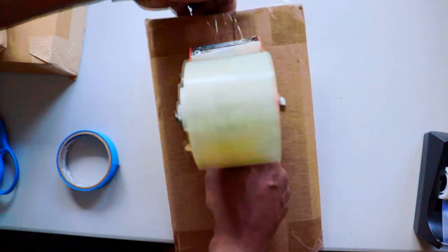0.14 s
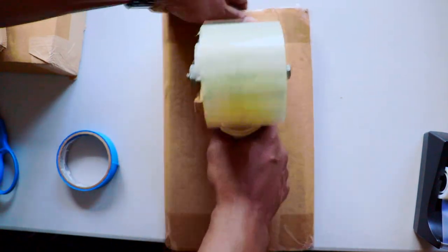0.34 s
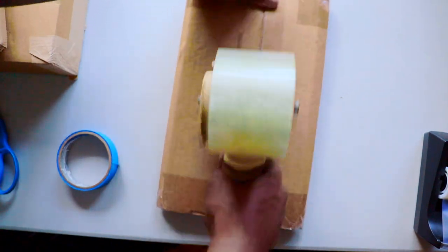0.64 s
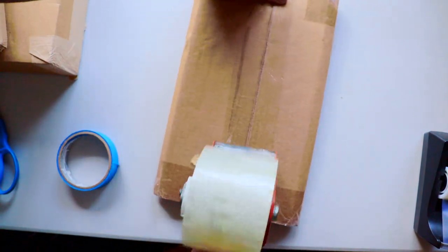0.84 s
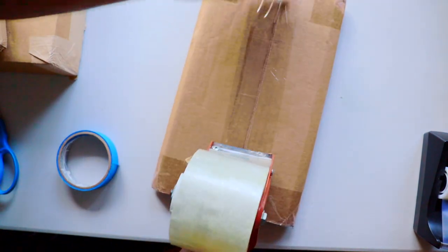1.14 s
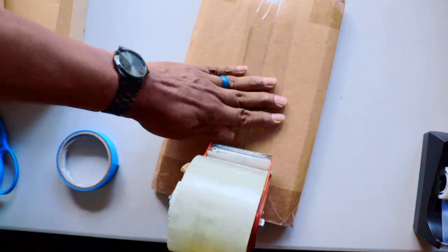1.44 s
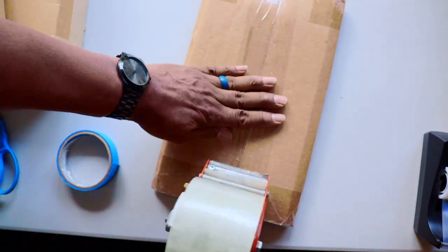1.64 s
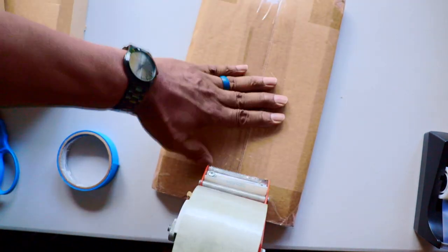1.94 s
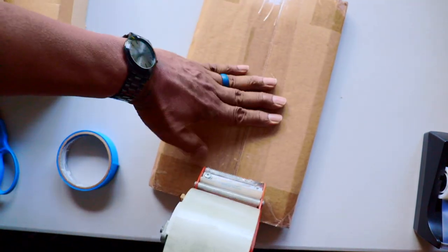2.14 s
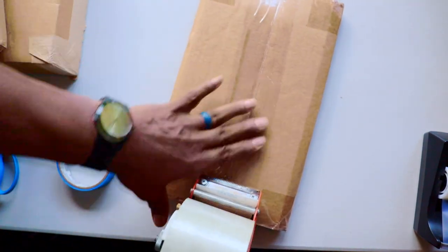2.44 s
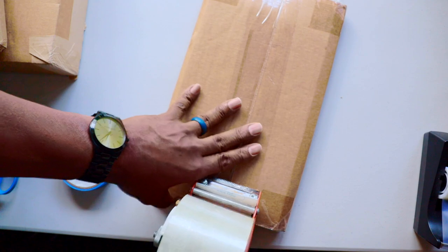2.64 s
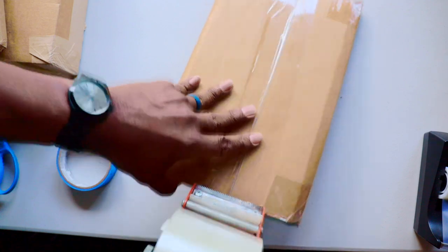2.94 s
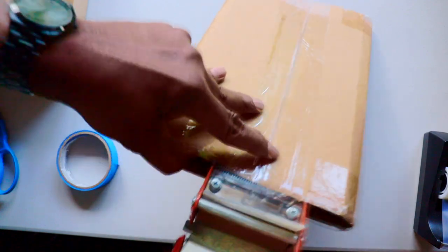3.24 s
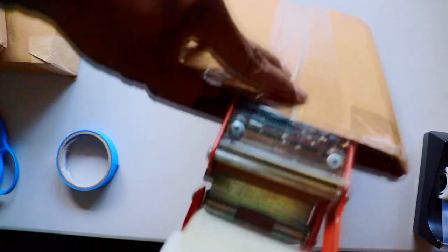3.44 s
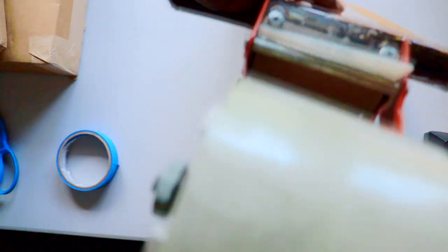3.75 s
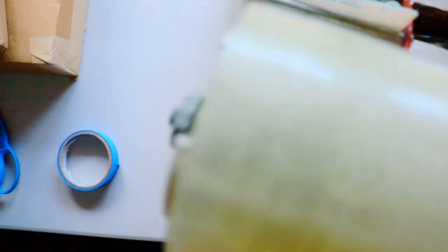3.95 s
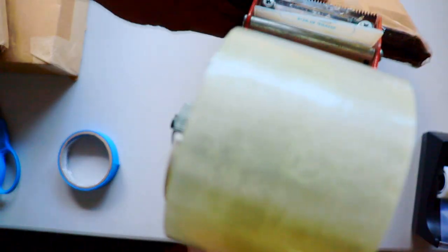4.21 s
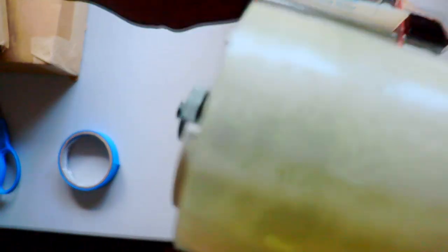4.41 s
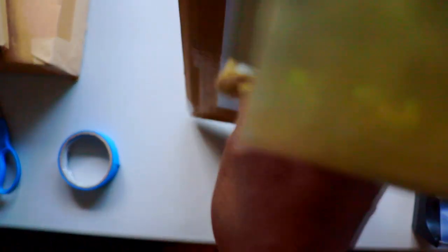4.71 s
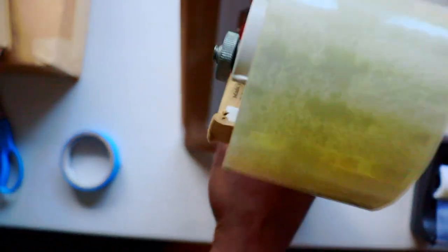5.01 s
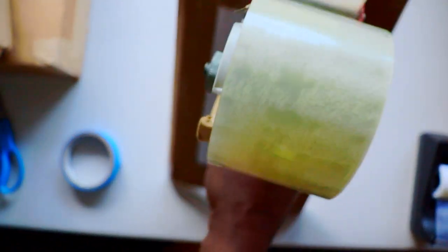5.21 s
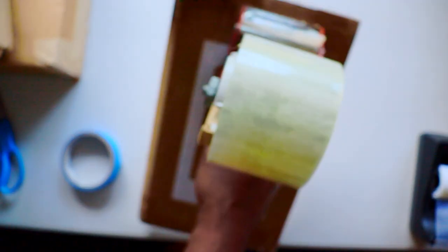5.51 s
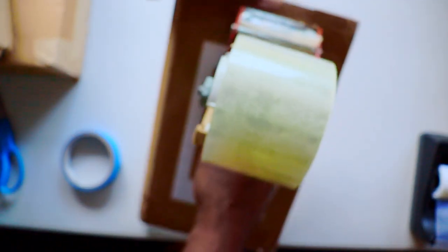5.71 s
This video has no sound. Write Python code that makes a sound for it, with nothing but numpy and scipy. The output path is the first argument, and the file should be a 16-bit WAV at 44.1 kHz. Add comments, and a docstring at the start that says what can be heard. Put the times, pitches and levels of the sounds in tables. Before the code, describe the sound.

Close stereo pickup, slightly right of centre, of sticky tape on a hollow carton on a table. Light scuffs and clacks lead to a long bright rip; sparse short rips and snaps follow. Later come roller scuffing, low box rumble, a juddering crackly tape drag with pops, a loud humming scrape of the dispenser and one final tug, with short room reflections.

```python
"""Packing tape leaves the roll of a handheld dispenser in a rasp of stick-slip snaps, laid on a cardboard box.
Uneven impulses excite film and cardboard: one long pull early on, short pulls and tugs before and after it,
and a late wrap round the edge. Roller and hand scuff the cardboard as filtered grains; the box rumbles and
bumps in its low modes, the frame drones, the roller squeaks in gliding tones, and clacks and pops are brief
resonant impulses. The box lies on a table in a small room, heard as drifting stereo reflections."""
import sys
import numpy as np
from scipy import signal
from scipy.io import wavfile
from scipy.ndimage import uniform_filter1d, map_coordinates

SR = 44100
rng = np.random.default_rng(int(sys.argv[2]) if len(sys.argv) > 2 else 0)


def generate_wav(signal):
    """Clip the signal to [-1, 1] and save it as 16-bit WAV at the path in sys.argv[1]."""
    frames = np.transpose(np.atleast_2d(signal))
    scaled = np.clip(frames, -1, 1) * 32767
    pcm = np.round(scaled).astype(np.int16)
    wavfile.write(sys.argv[1], SR, pcm)


N = 258867  # samples
TIME = np.arange(N) / SR  # seconds
BINS = np.fft.rfftfreq(4096, 1 / SR)  # frequencies of every body spectrum, Hz
EDGE_HZ = 16050  # upper band limit

# All levels in the tables are relative; most sources set a gain of their own on top, the crease pops do not.
# Brief scuffs of hand and dispenser. Each row: start in seconds, hold in seconds, level in dB,
# change over the hold in dB, hiss of the film against the scuff in dB.
SCUFF_STROKES = [(0.012, 0.026, -41.5, 4, 0), (0.099, 0.11, -45, 6, -8), (0.284, 0.024, -36.5, -14.5, -5),
                 (0.317, 0.069, -49.5, 8, -4), (1.101, 0.031, -48, 1, -10), (2.316, 0.11, -71.5, -3.5, 11),
                 (2.553, 0.16, -70, -12, 0.5), (2.755, 0.092, -52, 7, -1), (5.708, 0.2, -44.5, -11, -11.5)]
SCUFF_RISE_S, SCUFF_FALL_S = 0.049, 0.045  # time to reach full level; time to lose 30 dB
# The roller runs over the cardboard, one list a run. Each row: time in seconds, level of the scuff in dB,
# level of the hiss in dB.
ROLLER_RUNS = [
    [(3.04, -44, -51), (3.066, -37, -44.5), (3.096, -44.5, -44), (3.116, -47, -48), (3.166, -49.5, -62),
     (3.194, -43, -49), (3.38, -38, -49.5), (3.41, -51, -55.5), (3.436, -39.5, -43.5), (3.498, -50.5, -61),
     (3.574, -52, -65), (3.615, -70, -100)],
    [(3.715, -65, -61), (3.749, -55.5, -51.5), (3.759, -54, -63), (3.785, -40, -45.5), (3.853, -47.5, -62),
     (3.945, -32.5, -41.5), (3.985, -32.5, -43.5), (4.067, -41.5, -47), (4.229, -36.5, -48.5),
     (4.239, -36, -53), (4.321, -39.5, -46.5), (4.4, -41, -42.5)],
    [(4.95, -46.5, -61), (5.016, -51.5, -77.5), (5.058, -44, -73), (5.122, -30.5, -36), (5.178, -29, -48.5),
     (5.202, -29.5, -37), (5.388, -29.5, -38.5), (5.45, -35, -47.5), (5.47, -39.5, -45),
     (5.478, -47, -42.5), (5.562, -40, -43.5), (5.62, -80, -89)],
]
# Spectrum of scuffed cardboard. Each row: frequency in Hz, level in dB.
SCUFF_SPECTRUM = [(250, -37.5), (420, -8), (552, -5), (970, -9.5), (1840, -8), (2350, -13.5), (2570, -7.5),
                  (2900, -13.5), (4180, -20), (8170, -27.5), (14100, -30.5), (16000, -29.5)]

# The box rumbles under the roller. Each row: start in seconds, hold in seconds, level in dB,
# change over the hold in dB.
RUMBLE_STROKES = [(0.07, 0.064, -46.5, -2), (1.125, 0.033, -44, -15), (3.28, 0.17, -56, 8.5),
                  (3.55, 0.037, -53, -9), (3.8, 0.074, -55.5, 3), (3.92, 0.31, -37.5, 0),
                  (4.4, 0.48, -35.5, -16.5)]
# The frame drones as the roller runs. Each row: start in seconds, hold in seconds, level in dB,
# change over the hold in dB.
DRONE_STROKES = [(5.115, 0.22, -27, 3.5), (5.549, 0.012, -35.5, -0.5)]
SHAKE_RISE_S, SHAKE_FALL_S = 0.049, 0.068  # box or frame: time to reach full level; time to lose 30 dB
# Spectrum of the hollow box. Each row: frequency in Hz, level in dB.
HOLLOW_SPECTRUM = [(18, -57.5), (30, -23.5), (49, -21.5), (81, -7.5), (177, 0.5), (212, -8), (312, 3),
                   (405, -31), (500, -12), (650, -33.5), (1100, -120)]
# Modes of the dispenser frame. Each row: frequency in Hz, width in Hz, level in dB.
FRAME_MODES = [(319.2, 23, 11), (258, 120, -14), (200, 28, -13), (555, 29, -2)]

# Broad clacks of the dispenser and its taut tape. Each row: start in seconds, level in dB, centre in Hz.
CLACKS = [(0.02, -13, 970), (0.096, -18.5, 2180), (0.171, -18.5, 3500), (0.262, -17.5, 1566),
          (0.274, -24.5, 3260), (0.492, -6, 3830), (1.469, -46, 1100), (1.883, -40.5, 6950),
          (2.42, -41.5, 3500), (2.728, -40.5, 1690), (2.86, -39, 4030), (3.237, -24.5, 890),
          (3.333, -26, 1830), (3.43, -21, 890), (3.441, -36, 2470), (3.472, -28, 1200), (3.626, -38, 5300),
          (3.638, -36.5, 4900), (3.778, -29.5, 2000), (4.239, -21.5, 3550), (4.269, -20, 2030),
          (4.809, -11.5, 3900), (5.238, -22, 6260), (5.706, -25, 1320), (5.75, -25.5, 1490)]
# Creases in the stretched tape pop. Each row: start in seconds, level in dB.
CREASE_POPS = [(4.526, 2), (4.532, -10), (4.585, -4), (4.83, -6), (4.847, -3.5), (4.871, 2), (5.36, -10),
               (5.381, -2), (5.407, -6.5), (5.468, -1.5), (5.493, -11), (5.529, -13), (5.565, -17)]
POP_HZ, POP_OCTAVES, CLACK_OCTAVES = 1800, 0.75, 2.1  # centre of a pop; spread of a pop and of a clack
# Spectrum that the clicking parts radiate. Each row: frequency in Hz, level in dB.
SMALL_PARTS_SPECTRUM = [(40, -41), (300, 5), (1000, -6), (7000, -6), (16000, -11)]

# Bumps on the box. Each row: start in seconds, level in dB, centre in Hz, 60 dB decay at the centre in seconds.
BOX_BUMPS = [(0.02, -19, 435, 0.13), (0.658, -20.5, 376, 0.015), (0.755, -14.5, 294, 0.015),
             (1.122, -34, 175, 0.021), (4.002, -20.5, 278.6, 0.077)]
# Modes of the box panels. Each row: frequency in Hz, level in dB.
PANEL_MODES = [(92, -12), (148, -8.5), (180, -0.5), (245, -0.5), (315, -2.5), (440, 2.5), (560, -4.5),
               (760, -14)]

# The roller squeaks. Each row: start in seconds, level in dB, first pitch in Hz, last pitch in Hz,
# length in seconds.
ROLLER_SQUEAKS = [(0.129, -37.5, 940, 630, 0.0207), (0.197, -40.5, 2660, 1960, 0.044),
                  (2.834, -42, 780, 840, 0.012), (3.074, -34, 574, 566, 0.03),
                  (3.245, -39, 730, 690, 0.029), (5.558, -38, 2284, 2070, 0.016),
                  (5.822, -34.5, 846, 690, 0.012)]

# Short pulls. Each row: start in seconds, hold in seconds, level in dB, change over the hold in dB,
# share passed into the cardboard in dB, resonance of the free tape in Hz.
SHORT_PULLS = [(0.432, 0.074, -40, 1.5, -7, 3300), (1.601, 0.103, -18.5, -12.5, -7.5, 2150),
               (2.129, 0.044, -61, 1, -21.5, 3000), (2.901, 0.013, -15, 0, -11, 3230),
               (2.956, 0.056, -21, 1, -3, 2100), (5.779, 0.038, -38, -0.5, -22, 4000),
               (5.862, 0.02, -21, 6, -12.5, 3880)]
PULL_RISE_S, PULL_FALL_S = 0.047, 0.05  # time to reach full level; time to lose 30 dB
# Spectrum of flat film. Each row: frequency in Hz, level in dB.
FILM_SPECTRUM = [(29, -55), (50, -30), (193, -9.5), (600, -5), (661, -7), (764, -6.5), (841, -7.5),
                 (1120, -3), (1300, -3.5), (2370, 0.5), (2810, -3), (3670, 3), (5020, -7), (14500, -10.5),
                 (16000, -14)]
# Resonances of roll and dispenser. Each row: frequency in Hz, width in Hz, lift in dB.
ROLL_RESONANCES = [(303.3, 27, 17), (440.5, 41, 8.5), (600, 53, 3), (767, 110, 4.5), (1140, 40, 9),
                   (1750, 70, -5), (1860, 580, 3), (2100, 90, 2.5), (2444, 42, 5), (3130, 120, 0),
                   (3500, 130, -0.5), (4050, 240, 2), (4260, 300, 3)]

# Short tugs that tear a little tape off the roll. Each row: time of the snap in seconds, level in dB.
TAPE_TUGS = [(0.4718, -15.5), (0.4923, -12.5), (1.9048, -21), (1.926, -13.5), (1.948, -18.5), (1.9894, -16),
             (2.188, -22.5), (2.1995, -19), (2.2043, -25.5), (2.2375, -13.5), (2.2495, -14),
             (2.7644, -16.5), (2.7808, -26.5)]
# A tug of level TUG_DB dies away in TUG_T60_S; one harder by TUG_HALVING_DB, in half of it.
TUG_T60_S, TUG_DB, TUG_HALVING_DB = 0.068, -13.5, 10
STRAIN_DB, STRAIN_S, TUG_RING_DB = -18, 0.007, -15  # crackle before the snap, its growth time; frame ring
# Spectrum of slack film. Each row: frequency in Hz, level in dB.
SLACK_SPECTRUM = [(47, -41.5), (80, -13.5), (248, -17), (309, -8.5), (515, -11.5), (2130, -2), (3100, -2.5),
                  (4230, -3.5), (7190, -11), (13700, -11), (16000, -16.5)]

# The long pull along the top of the box. Each row: time in seconds, level in dB.
LONG_PULL_CURVE = [(0.52, -36), (0.544, -15.5), (0.564, -14), (0.588, -25), (0.66, -15.5), (0.68, -26),
                   (0.692, -19.5), (0.76, -18), (0.774, -26), (0.884, -28), (0.91, -46.5)]

# The tape dragged round the edge of the box. Each row: time in seconds, level in dB,
# share passed into the cardboard in dB.
WRAP_CURVE = [(4.36, -45, 5), (4.388, -34, -5), (4.462, -38.5, 7), (4.53, -17.5, -0.5),
              (4.552, -16.5, -12.5), (4.564, -23.5, -6.5), (4.624, -24.5, -2), (4.668, -33, -5.5),
              (4.728, -29, -1), (4.772, -39.5, 1.5), (4.814, -21.5, -9), (4.904, -24, -5),
              (4.945, -41.5, -17)]
# Spectrum of creased film. Each row: frequency in Hz, level in dB.
CREASED_SPECTRUM = [(29, -43), (50, -19), (103, -19), (171, -20), (218, -17.5), (328, -4.5), (370, -11),
                    (728, -5.5), (1470, -6), (1910, -4.5), (4780, -12.5), (13800, -23.5), (16000, -22.5)]

# Decay of the room. Each row: frequency in Hz, 60 dB decay time in seconds.
ROOM_DECAY = [(100, 0.17), (400, 0.15), (1000, 0.18), (2800, 0.19), (7000, 0.2), (15000, 0.12)]
# Stereo coherence of the reflections. Each row: frequency in Hz, left-right likeness from 0 to 1.
LIKENESS = [(100, 0.82), (500, 0.89), (1500, 0.45), (4000, 0.25), (9000, 0.039)]


def amp(db):
    """Decibel law: amplitude gain from a level in dB."""
    return 10 ** (np.asarray(db) / 20)


def unit(x):
    """Normalisation: scales to rms 1."""
    return x / np.sqrt(np.mean(x ** 2) + 1e-20)


def evened(x, size):
    """Power regulation: divides by the running rms over so many samples."""
    return x / np.sqrt(abs(uniform_filter1d(x ** 2, size=size)) + 1e-9)


def read(points, hz):
    """Interpolation of (Hz, value) points along a log-frequency axis."""
    f, value = np.transpose(points)
    return np.interp(np.log(hz + 1), np.log(f + 1), value)


def add(mix, s, sound):
    """Superposition: mixes a sound in at a time in seconds."""
    part = mix[max(round(s * SR), 0):][:len(sound)]
    part += sound[:len(part)]


def follow(curves, axis=1):
    """Envelope: smoothed gain from one dB column of several curves, silent outside them."""
    total = np.zeros(N)
    for rows in map(np.array, curves):
        total += amp(np.interp(TIME, rows[:, 0], rows[:, axis], left=-200, right=-200))
    return abs(uniform_filter1d(total, size=130))


def stroke(s, hold, db, change_db, rise_s, fall_s):
    """Envelope of one move of the hand: attack, a hold that swells or sags, exponential release."""
    t = TIME - s
    attack = np.clip(1 + t / rise_s, 0, 1) ** 2  # full level at the start time
    release_db = -30 * np.clip((t - hold) / fall_s, 0, 6)
    return attack * amp(db + change_db * np.clip(t / hold, 0, 1) + release_db)


def ring(db):
    """Minimum phase: the causal impulse response of energy 1 whose spectrum has this shape."""
    log_gain = np.log(amp(np.maximum(db - db.max(), -90)))
    circle = np.r_[log_gain, log_gain[-2:0:-1]]
    response = np.fft.ifft(np.exp(np.conj(signal.hilbert(circle)))).real
    return response / np.linalg.norm(response)


def colour(x, db):
    """Source-filter principle: convolves a source with the response of a body."""
    return signal.oaconvolve(x, ring(db))[:len(x)]


def split(x, hz):
    """Band division: the parts below and above a frequency."""
    filters = [signal.butter(3, hz, kind, fs=SR, output="sos") for kind in ("low", "high")]
    return [signal.sosfilt(sos, x) for sos in filters]


def roll_db():
    """Resonance: peaks and dips in dB that roll and dispenser give to what touches them."""
    return sum(db / (1 + (2 * (BINS - hz) / width) ** 2) for hz, width, db in ROLL_RESONANCES)


def frame_db():
    """Modal superposition: spectrum in dB of the ringing dispenser frame."""
    gain = sum(amp(db) / (1 + (2 * (BINS - hz) / width) ** 2) for hz, width, db in FRAME_MODES)
    return 20 * np.log10(gain)


def slips(per_s, jitter, spread_db, fizz):
    """Stick-slip: snaps at uneven intervals and of uneven size, over the fizz of fine threads; power 1."""
    wait, size = rng.standard_normal((2, N // 8))
    travel = np.cumsum(per_s * np.ones(N)) / SR  # in mean slips
    slip_at = np.cumsum(np.exp(jitter * wait - jitter ** 2 / 2))
    sample = np.minimum(np.searchsorted(travel, slip_at), N)
    snaps = np.bincount(sample, amp(spread_db * size), N + 1)[:N]
    # a big snap relieves the tension, so the power evens out over a few snaps
    return evened(unit(snaps) + fizz * rng.standard_normal(N), size=900)


def wander(x, depth_db):
    """Moving excitation: as the contact point travels over the panels, mid resonances come and go."""
    hz, t, z = signal.stft(x, SR, nperseg=512)
    patches = rng.standard_normal((len(t) // 10 + 2, 56))  # random lift over time and log frequency
    place = np.meshgrid(np.arange(len(t)) / 10, 7 * np.log2(1 + hz / 200))
    mids = read([(250, .1), (600, 1), (2400, 1), (5000, .3)], hz)[:, None]
    lift_db = depth_db * mids * map_coordinates(patches, place, order=1)
    return signal.istft(z * amp(lift_db), SR, nperseg=512)[1][:N]


def sliding():
    """Sliding contact: gains of the scuff and of the film hiss, over all runs and scuffs."""
    scuff, hiss = follow(ROLLER_RUNS, axis=1), follow(ROLLER_RUNS, axis=2)
    for s, hold, db, change_db, hiss_db in SCUFF_STROKES:
        move = stroke(s, hold, db, change_db, SCUFF_RISE_S, SCUFF_FALL_S)
        scuff, hiss = scuff + move, hiss + amp(hiss_db) * move
    return scuff, hiss


def slide(scuff_gain, hiss_gain, scuff_db, hiss_db, lift, wander_db):
    """Dry friction: fibres of the cardboard catch and let go under roller and hand."""
    grains = slips(per_s=400, jitter=.9, spread_db=5.5, fizz=1.0)
    rubbed = colour(grains, read(SCUFF_SPECTRUM, BINS) + lift * roll_db())
    scuff, hiss = split(wander(rubbed, wander_db), 4000)
    return amp(scuff_db) * scuff_gain * unit(scuff) + amp(hiss_db) * hiss_gain * unit(hiss)


def rumble(scuff_gain, scuff_db, box_db, drone_db):
    """Forced vibration: the juddering roller shakes box and frame; any scuff stirs the box a little."""
    judder = slips(per_s=130, jitter=0.81, spread_db=6.5, fizz=0.054)
    shake = sum(stroke(*row, SHAKE_RISE_S, SHAKE_FALL_S) for row in RUMBLE_STROKES)
    drone = sum(stroke(*row, SHAKE_RISE_S, SHAKE_FALL_S) for row in DRONE_STROKES)
    box = evened(colour(judder, read(HOLLOW_SPECTRUM, BINS)), size=2200)
    frame = evened(colour(judder, frame_db()), size=1100)
    return box * (amp(box_db) * shake + amp(scuff_db) * scuff_gain) + frame * amp(drone_db) * drone


def click(hz, octaves, depth_db, chatter, chatter_s, knock_db, knock_s):
    """Impulse response: a snap and brief chatter through a broad resonance, with a short knock."""
    t = TIME[:SR // 16]
    blow = (t == 0) + chatter * rng.standard_normal(len(t)) * np.exp(-t / chatter_s)
    shape_db = depth_db / (1 + (np.log2((BINS + 1) / hz) / octaves) ** 2)
    knock = amp(knock_db) * np.sin(2 * np.pi * hz * t) * t / knock_s * np.exp(1 - t / knock_s)
    return colour(blow, shape_db + read(SMALL_PARTS_SPECTRUM, BINS)) + knock


def clicks(clack_db):
    """Transient excitation: the dispenser clacks and the creases pop."""
    out = np.zeros(N)
    for s, db, hz in CLACKS:
        clack = click(hz, CLACK_OCTAVES, depth_db=21, chatter=0.14, chatter_s=0.0035,
                      knock_db=-16.5, knock_s=.0005)
        add(out, s, amp(db + clack_db) * clack)
    for s, db in CREASE_POPS:
        pop = click(POP_HZ, POP_OCTAVES, depth_db=27, chatter=0.05, chatter_s=0.003,
                    knock_db=-14, knock_s=.0004)
        add(out, s, amp(db) * pop)
    return out


def bumps(level_db, reach, contact_s):
    """Modal decay: a blow rings the panels; a low centre excites only low modes, and high ones die sooner."""
    out, t = np.zeros(N), TIME[:SR // 4]
    for s, db, centre_hz, t60 in BOX_BUMPS:
        thud = np.zeros(len(t))
        for hz, mode_db in PANEL_MODES:
            decay = amp(mode_db - 60 * t / t60 * np.sqrt(hz / centre_hz))
            excited = 1 / (1 + (hz / centre_hz / reach) ** 4)
            thud += decay * excited * np.sin(2 * np.pi * (hz * t + rng.random()))
        thud = split(thud * (1 - np.exp(-t / contact_s)), 80)[1]  # soft onset, no deep bass
        add(out, s, amp(db + level_db) * thud / abs(thud).max())
    return out


def squeaks(level_db, waver, overtone):
    """Mode locking: for a moment the slips lock into a gliding, wavering tone."""
    out = np.zeros(N)
    for s, db, first_hz, last_hz, length in ROLLER_SQUEAKS:
        n = int(length * SR)
        drift = unit(uniform_filter1d(rng.standard_normal(n), size=60))
        hz = np.linspace(first_hz, last_hz, n) * (1 + waver * drift)
        angle = 2 * np.pi * np.cumsum(hz) / SR
        tone = np.sin(angle) + overtone * np.sin(2 * angle)
        add(out, s, amp(db + level_db) * np.hanning(n) * tone)
    return out


def free_tape(x, tape_hz, lift_db, octaves):
    """Tension resonance: the stretched tape between roll and box favours one moving band."""
    hz, t, z = signal.stft(x, SR, nperseg=256)
    away = np.log2((hz[:, None] + 1) / np.interp(t, TIME, tape_hz)) / octaves
    return signal.istft(z * amp(lift_db / (1 + away ** 2)), SR, nperseg=256)[1][:N]


def peel(pull, into_box, tape_hz, spectrum, per_s, jitter, spread_db, fizz, film_db, lift, wander_db):
    """Stick-slip peeling: a harder pull slips faster; film radiates the top and cardboard the body."""
    most_db = -12  # the glue only holds so much, so the hardest pull levels off
    level = pull / (1 + (pull / amp(most_db)) ** 4) ** (1 / 4)
    speed = .5 + np.sqrt(level / level.max())
    snaps = slips(per_s * speed, jitter, spread_db, fizz)
    rasp = colour(snaps, read(spectrum, BINS) + lift * roll_db())
    rasp = free_tape(wander(rasp, wander_db), tape_hz, lift_db=3.5, octaves=0.81)
    body, top = split(rasp, 1400)
    # the pull sets the power, whichever resonances are speaking
    body, top = evened(body, size=1800), evened(top, size=1300)
    return level * (amp(film_db) * top + into_box * body)


def short_pulls(box_db):
    """Peeling in strokes: alike in attack and release, each with its own free tape and box contact."""
    each = np.array([stroke(*row[:4], PULL_RISE_S, PULL_FALL_S) for row in SHORT_PULLS])
    share_db, tape_hz = np.array(SHORT_PULLS)[each.argmax(0), 4:].T  # from the loudest pull
    return peel(each.sum(0), amp(box_db + share_db), tape_hz, FILM_SPECTRUM, per_s=360, jitter=.45,
                spread_db=4.3, fizz=.3, film_db=-1.24, lift=0.59, wander_db=-2.5)


def tugs(level_db, snap):
    """Strain release: the tape crackles, then a snap frees a dying flurry of slips and rings the frame."""
    flurry, first = np.zeros(N), np.zeros(N)
    for s, db in TAPE_TUGS:
        near = abs(TIME - s) < .2
        t = TIME[near] - s
        t60 = TUG_T60_S * 2 ** ((TUG_DB - db) / TUG_HALVING_DB)
        strain = amp(STRAIN_DB) * np.exp(-abs(t) / STRAIN_S)
        dying = amp(-60 * abs(t) / t60)
        flurry[near] += amp(db) * np.where(t < 0, strain, dying)
        add(first, s, amp([db]))
    drive = flurry * slips(per_s=810, jitter=.6, spread_db=8.0, fizz=.6) + snap * first
    film = colour(drive, read(SLACK_SPECTRUM, BINS) + 0.6 * roll_db())
    return amp(level_db) * (film + amp(TUG_RING_DB) * colour(drive, frame_db()))


def long_pull(box_db, start_hz, end_hz):
    """Rising tension: in one long draw along the top, the free tape rings higher as it tightens."""
    tape_hz = np.interp(TIME, [LONG_PULL_CURVE[0][0], LONG_PULL_CURVE[-1][0]], [start_hz, end_hz])
    return peel(follow([LONG_PULL_CURVE]), amp(box_db), tape_hz, FILM_SPECTRUM, per_s=340, jitter=.45,
                spread_db=4.3, fizz=.28, film_db=-0.43, lift=0.62, wander_db=2.5)


def judder_gain(per_s, share):
    """Amplitude modulation: the whole roll jerks and catches, so the rasp comes in quick surges."""
    jerks = abs(slips(per_s=per_s, jitter=.35, spread_db=2, fizz=0))
    surges = signal.lfilter([1], [1, -np.exp(-1 / (.005 * SR))], jerks)  # decay constant 5 ms
    return unit(1 - share + share * unit(surges))


def wrap(box_db, taut_hz, stiffening):
    """Tension stiffening: creased tape judders round the edge and rings higher the harder the pull."""
    pull = follow([WRAP_CURVE])
    into_box = amp(box_db) * follow([WRAP_CURVE], axis=2)
    tape_hz = taut_hz * (pull / pull.max() + .01) ** stiffening
    rasp = peel(pull, into_box, tape_hz, CREASED_SPECTRUM, per_s=250, jitter=.6,
                spread_db=3.8, fizz=.38, film_db=-0.84, lift=0.21, wander_db=0.0)
    return rasp * judder_gain(per_s=62, share=.45)


def reflections(near_db, near_t60, tail_db):
    """Diffuse decay: a stereo response of quick reflections from table and box, and the short room tail."""
    hz, t, z = signal.stft(rng.standard_normal((2, SR // 4)), SR, nperseg=128)
    alike = np.clip(read(LIKENESS, hz), 0, 1)[:, None]
    mid, side = np.sqrt(1 + alike) * z[0], np.sqrt(1 - alike) * z[1]
    near, tail = amp(-60 * t / near_t60), amp(-60 * t / read(ROOM_DECAY, hz)[:, None])
    envelope = np.hypot(amp(near_db) * unit(near), amp(tail_db) * unit(tail))
    echoes = signal.istft(np.array([mid + side, mid - side]) * envelope, SR, nperseg=128)[1]
    return np.pad(echoes / np.sqrt(echoes.shape[1]), ((0, 0), (40, 0)))  # after 40 samples


def room(x, near_db, near_t60, tail_db, count=5):
    """Moving source: as the dispenser moves, its sound drifts between several sets of reflections."""
    knots = np.arange(0, N / SR + .1, .025)
    drifts = rng.standard_normal((count, len(knots)))
    shares = np.array([np.interp(TIME, knots, row) for row in drifts])
    shares /= np.linalg.norm(shares, axis=0)
    echoes = np.zeros((2, N))
    for share in shares:
        response = reflections(near_db, near_t60, tail_db)
        echoes += signal.oaconvolve((x * share)[None], response, axes=1)[:, :N]
    return (x + echoes) / np.sqrt(1 + amp(near_db) ** 2 + amp(tail_db) ** 2)


def scene():
    """Superposition in the room: tape, dispenser and box a little to the right, over faint air noise."""
    scuff, hiss = sliding()
    handling = slide(scuff, hiss, scuff_db=-2.5, hiss_db=1.5, lift=0.84, wander_db=3.0)
    handling += squeaks(level_db=4.5, waver=0.054, overtone=0.25)
    low = rumble(scuff, scuff_db=-22, box_db=1.0, drone_db=-5.5)
    low += bumps(level_db=-0.5, reach=2.1, contact_s=0.0039)
    ticks = clicks(clack_db=8.0)
    tape = short_pulls(box_db=-1.5) + tugs(level_db=-9.0, snap=6)
    tape += long_pull(box_db=-10.5, start_hz=3300, end_hz=3900)
    tape += wrap(box_db=0.0, taut_hz=2300, stiffening=0.74)
    # left and right gains in dB
    wet = room(tape, near_db=5.0, near_t60=0.041, tail_db=-4.5) * amp([[-1.], [1.]])
    wet += room(handling, near_db=3.5, near_t60=0.021, tail_db=-8.5) * amp([[-.5], [.5]])
    wet += room(ticks, near_db=-1, near_t60=0.087, tail_db=-16) * amp([[-.4], [.4]])
    wet += room(low, near_db=-7.5, near_t60=0.05, tail_db=-17.5) * amp([[-.6], [.6]])
    air_db = -10 * np.log10(BINS + 100)
    air = np.array([colour(rng.standard_normal(N), air_db) for _ in range(2)])
    return wet + amp(-80) * air


def record(dry):
    """Transduction: deep bass is lost, a gate lowers quiet moments, peaks round off, then the band limit."""
    bass_hz = 55
    lean = signal.sosfilt(signal.butter(2, bass_hz, "high", fs=SR, output="sos"), dry)
    power_db = 10 * np.log10(abs(uniform_filter1d((lean ** 2).mean(0), size=700)) + 1e-14)
    threshold_db, slope = -62, .4  # dB of cut for each dB below the threshold
    gated = lean * amp(slope * np.minimum(power_db - threshold_db, 0))
    rounded = gated / (1 + abs(gated / .9) ** 6) ** (1 / 6)
    band_limit = signal.firwin(511, EDGE_HZ, window=("kaiser", 9), fs=SR)
    return signal.oaconvolve(rounded, band_limit[None], "same")


dry = scene()
out = record(dry)
generate_wav(out)
```